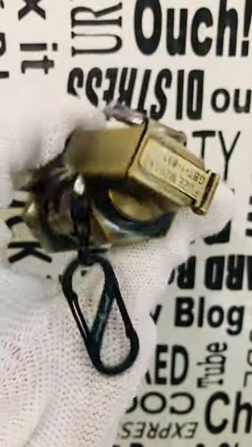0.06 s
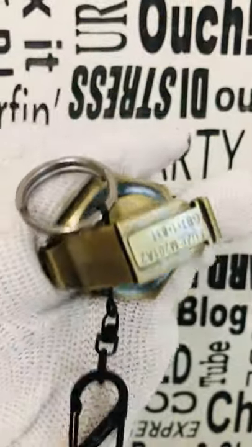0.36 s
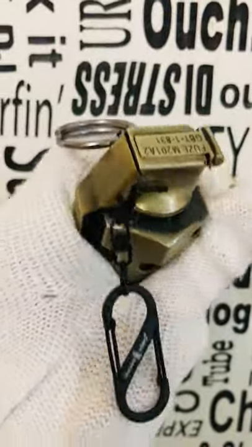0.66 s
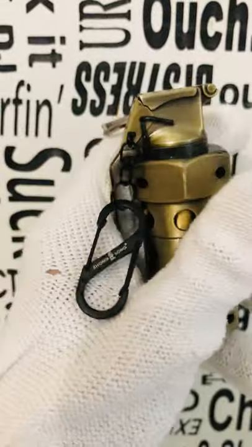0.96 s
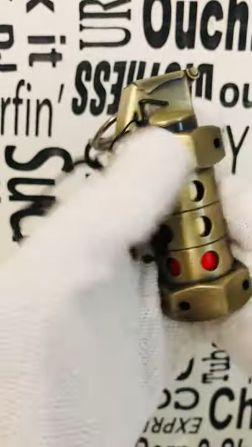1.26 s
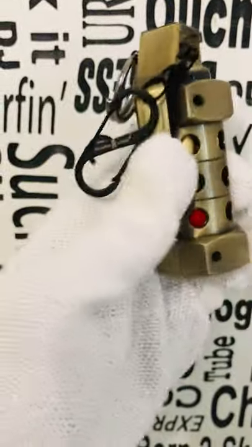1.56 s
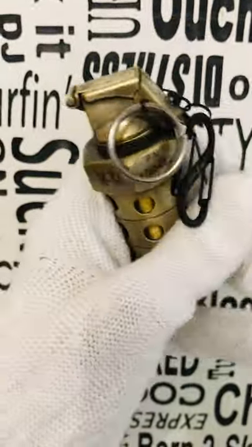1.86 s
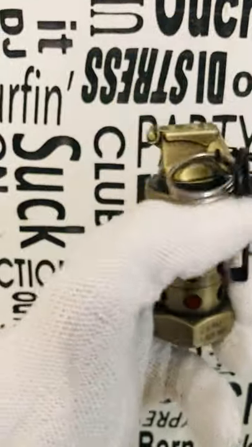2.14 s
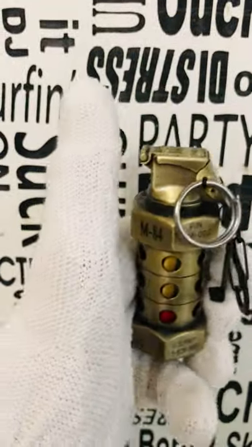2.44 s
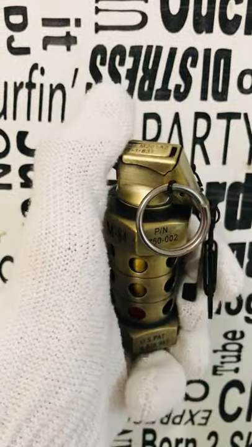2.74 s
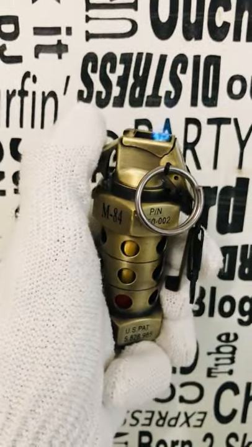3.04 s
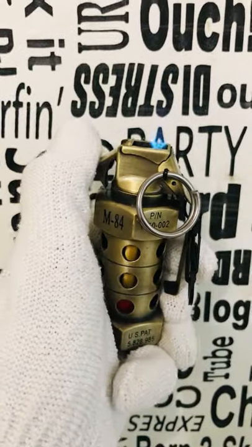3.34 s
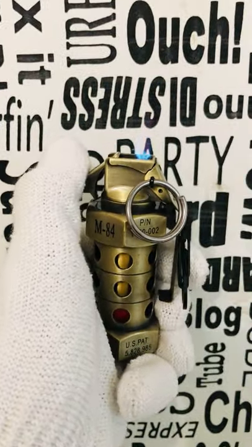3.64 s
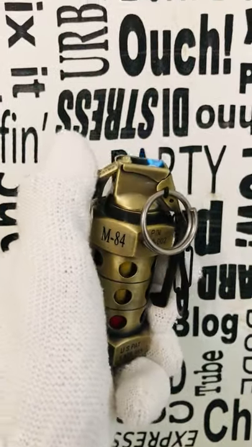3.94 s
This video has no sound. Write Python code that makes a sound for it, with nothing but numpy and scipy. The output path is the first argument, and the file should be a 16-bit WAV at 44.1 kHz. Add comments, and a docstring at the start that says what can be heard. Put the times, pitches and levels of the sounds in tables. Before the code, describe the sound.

A metal jet lighter is turned close by in a small room, its chain and ring clinking. Its lever snaps, gas hisses faintly, then a sharp click lights a steady, hissing flame with a low roar.

```python
"""A gloved hand turns a metal jet lighter close by in a small room. The glove rubs; chain, clip and
pull ring clink, and links rattle over the case. At 2.4 s the lever snaps twice against the case.
At 2.9 s the gas valve opens with a faint hiss. At 3.1 s the piezo igniter cracks and the gas catches
with a small thump that rings a room mode. The jet flame then burns steadily, a low roar under a hiss."""
import sys
import numpy as np
from scipy import signal
from scipy.fft import rfft, irfft, next_fast_len
from scipy.io import wavfile
from scipy.ndimage import uniform_filter1d, map_coordinates

SR = 44100
rng = np.random.default_rng(int(sys.argv[2]) if len(sys.argv) > 2 else 0)


def unload_wav(signal):
    """Save mono or channel-first audio to the path in sys.argv[1] as 16-bit WAV at rate SR, clipped to [-1, 1]."""
    wavfile.write(
        sys.argv[1],
        SR,
        np.round(np.clip(np.atleast_2d(signal).T, -1, 1) * 32767).astype(np.int16),
    )


N = 176400
TOP_HZ, NOISE_TOP_HZ = 16400, 15800


def amp(db):
    """Decibels to gain."""
    return 10 ** (np.asarray(db) / 20)


def unit(x):
    """Scale to rms 1."""
    return x / np.sqrt(np.mean(x ** 2) + 1e-20)


def along(points, hz):
    """Interpolate (Hz, value) points on a log frequency axis."""
    knots_hz, values = np.transpose(points)
    return np.interp(np.log(hz + 1), np.log(knots_hz + 1), values)


def curves(rows):
    """One value per sample for each column after the time."""
    times_s, *columns = np.transpose(rows)
    return [np.interp(np.arange(N) / SR, times_s, column) for column in columns]


def since(start_s):
    """Seconds since start_s, zero before."""
    return np.maximum(np.arange(N) / SR - start_s, 0)


def wobble(rate_hz):
    """A smooth random curve, rate_hz knots a second."""
    knots = rng.standard_normal(int(N * rate_hz / SR) + 4)
    return map_coordinates(knots, [np.arange(N) * rate_hz / SR])


def filtered(x, gain):
    """Apply gain(hz) to the spectrum of x."""
    size = next_fast_len(N + SR // 2)
    return irfft(rfft(x, size) * gain(np.fft.rfftfreq(size, 1 / SR)), size)[:N]


def noise(spectrum):
    """Noise of rms 1, coloured by (Hz, dB) points."""
    white = rng.standard_normal(N)
    return unit(filtered(white, lambda hz: amp(along(spectrum, hz)) * (hz < NOISE_TOP_HZ)))


def add(out, start_s, x):
    """Mix x into out at start_s."""
    part = out[int(start_s * SR):][:len(x)]
    part += x[:len(part)]


def ring(modes, size=8192):
    """Damped sines (Hz, dB, t60 s) of alternating sign."""
    t = np.arange(size) / SR
    return sum((-1) ** k * amp(db - 60 * t / t60_s) * np.sin(2 * np.pi * hz * t)
               for k, (hz, db, t60_s) in enumerate(modes))


def crack(t60_s, body, peaks, tone=((1, 0),), size=8192, smooth_bins=256):
    """Dense metal modes: a noise burst shaped by body, peaks and tone; rms 1 over its first 5 ms."""
    t, hz = np.arange(size) / SR, np.fft.rfftfreq(size, 1 / SR)
    burst = rfft(rng.standard_normal(size) * amp(-60 * t / t60_s))
    burst_power = uniform_filter1d(np.abs(burst) ** 2, size=smooth_bins)
    peak_power = sum(amp(db) ** 2 / (1 + (2 * (hz - centre_hz) / width_hz) ** 2) ** 2
                     for centre_hz, width_hz, db in peaks)
    power = amp(along(body, hz)) ** 2 + peak_power
    gain = np.sqrt(power / burst_power) * amp(along(tone, hz))
    # Minimum phase keeps the attack sharp.
    cepstrum = irfft(np.log(gain))
    cepstrum[1:size // 2] *= 2
    cepstrum[size // 2:] = 0
    hit = irfft(burst * np.exp(rfft(cepstrum)))
    return hit / np.sqrt(np.mean(hit[:SR // 200] ** 2))


# Room rumble. Each row: frequency in Hz, gain in dB.
RUMBLE_SPECTRUM = [(22, -30.5), (45, 1.5), (150, -6.5), (550, -17), (1300, -24.5), (3000, -52.5)]
def background(rumble_db=-69.5, hiss_db=-78.5):
    """The room's quiet rumble and a faint, even hiss."""
    rumble = amp(rumble_db) * noise(RUMBLE_SPECTRUM)
    hiss = amp(hiss_db) * noise([(1000, 5), (3000, 0.5), (15000, -9.5)])
    return rumble + hiss


# Glove on metal. Each row: time in seconds, level in dB.
RUB_LEVELS = [(0, -77.5), (.1, -74), (.165, -60), (.22, -62.5), (.31, -74), (.45, -68.5), (.51, -75),
              (.63, -76), (.67, -71.5), (.94, -70), (1.11, -79), (1.33, -67.5), (1.56, -66.5),
              (1.64, -65.5), (2.03, -72), (2.42, -55.5), (2.68, -78.5)]
# Grip shifts. Each row: centre in seconds, half length in seconds, level in dB.
GRIP_SHIFTS = [(0.797, 0.085, -69), (2.354, 0.055, -63.5)]
# Colours of rub and bump. Each row: frequency in Hz, gain in dB.
RUB_SPECTRUM = [(600, -8), (1100, -4), (3000, -2.5), (4400, -3), (5000, -4.5), (6500, 0), (10400, -4.5),
                (12000, 0), (15500, -2.5)]
BUMP_SPECTRUM = [(30, -14.5), (190, 0), (300, -22), (1000, -36)]
def glove(flutter_db=1.3):
    """Cotton rubs softly over the metal and bumps dully as the grip shifts."""
    t = np.arange(N) / SR
    rub_db, = curves(RUB_LEVELS)
    rub = amp(rub_db + flutter_db * wobble(65)) * noise(RUB_SPECTRUM)
    grip = sum(amp(db) * np.exp(-((t - centre_s) / half_s) ** 2) for centre_s, half_s, db in GRIP_SHIFTS)
    return rub + grip * noise(BUMP_SPECTRUM)


# Chain and ring contacts. Each row: start in seconds, relative level in dB, main resonance in Hz,
# gain at 1.5-3.8 kHz in dB, gain from 11.5 kHz up in dB, t60 in seconds.
CONTACTS = [(0.172, -38.5, 7350.0, -5.5, -1, 0.014), (0.1784, -44.5, 12600, 8.5, 10.5, 0.046),
            (0.2089, -46, 7500, -4, -6, 0.026), (0.2183, -51.5, 3080.0, 13, 9, 0.035),
            (0.2451, -37.5, 5280, -2.5, -3, 0.032), (0.2461, -38, 7440, -9, 3, 0.04),
            (0.257, -40, 12400, -1, 15, 0.016), (0.2972, -42.5, 3100, -2, 0, 0.02),
            (0.377, -54.5, 6700, 1, -3, 0.02), (0.98, -50, 4120.0, 8, -2, 0.04),
            (1.0214, -55.5, 4300, 5, 8, 0.023), (1.0387, -54.5, 2840.0, 4, 2, 0.022),
            (1.3316, -54.5, 4040, 9, 8.5, 0.032), (1.3803, -42.5, 6000, -5, -4, 0.015),
            (1.3873, -49.5, 6010.0, 5, 0, 0.028), (1.409, -27, 12050, -1.5, 3, 0.012),
            (1.4611, -40.5, 9580.0, -2.5, 4, 0.044), (1.5026, -36, 7740.0, -6.5, 0, 0.024),
            (1.5157, -50, 4630, -2, -8, 0.035), (1.5245, -47.5, 4630.0, 0, -5, 0.027),
            (1.5604, -47, 3320.0, -2, 1, 0.017), (1.5703, -41.5, 3260, 6, 3.5, 0.049),
            (1.604, -50, 3250, 12, -8, 0.027), (1.6624, -41, 3210.0, -7, -4.5, 0.043),
            (1.668, -48, 3210.0, 11, -1, 0.037), (1.6997, -46.5, 3180, 15, 10, 0.029),
            (1.7197, -33, 6300, -4, 3, 0.02), (1.7368, -41, 7630, 2, -7, 0.039),
            (1.8266, -39, 12330.0, -3, 0, 0.059), (1.851, -35.5, 3800, -1.5, 0, 0.031),
            (1.879, -48, 2730, 10, 5.5, 0.043), (1.885, -33.5, 12200, -2.5, 4, 0.024),
            (1.893, -41, 7600.0, -1.5, 0, 0.035), (1.901, -43, 5800, -0.5, -2.5, 0.033),
            (1.9243, -47.5, 3770, 2, 1, 0.026), (1.9365, -48.5, 3770, -1, -3.5, 0.049),
            (2.0813, -41, 1600, -1, -5.5, 0.042), (2.0884, -39, 2650, -2, 5.5, 0.053),
            (2.106, -41.5, 2580, 7, 5, 0.035), (2.1111, -35.5, 10200, -4.5, -0.5, 0.035),
            (2.12, -41, 6580.0, -1, -3, 0.09), (2.1468, -39, 12000, 2, 3, 0.039),
            (2.1608, -46, 8270.0, -2, -1.5, 0.035), (2.166, -42, 3920.0, 0.5, 0.5, 0.022),
            (2.1802, -42.5, 8700, -2.5, -0.5, 0.026), (2.1847, -47.5, 8550.0, 1, -8.5, 0.061),
            (2.263, -37, 7000, 1, 2.5, 0.045), (2.2808, -35, 12670.0, 0.5, 5, 0.019),
            (2.2953, -33, 12900, -4, -1, 0.013), (2.3501, -42, 2730, 6, 6.5, 0.12),
            (2.4062, -32, 7670.0, -3, 5.5, 0.022), (2.4556, -35, 12780.0, 4.5, 5, 0.015),
            (2.4637, -37.5, 5640, 2.5, -2.5, 0.079), (2.7529, -63.5, 10980, 7, 10, 0.021),
            (2.8076, -63.5, 5470.0, -3.5, -7.5, 0.015)]
# Broad colour of a clink. Each row: frequency in Hz, gain in dB.
CLINK_SPECTRUM = [(100, -33.5), (850, -21), (1250, -12.5), (1600, -4), (4500, -1.5), (5000, -6),
                  (6200, 2.5), (10400, -0.5), (15600, -1.5), (17000, -34.5)]
# Clip and ring resonances. Each row: centre in Hz, width in Hz, gain in dB.
HARDWARE_PEAKS = [(1740, 400, 0.5), (2680, 150, 2), (3120, 180, 1), (4360, 930, -0.5), (7440, 510, 2.5),
                  (12230, 1700, 2.5)]
PEAK_WIDTH_HZ, STRUCK_PEAK_DB, LINK_LOW_HZ = 305, 11, 2600
def chain_clinks(link_peak_db=7, link_top_hz=15800):
    """Each contact rings the struck part and three nearby links."""
    out = np.zeros(N)
    for start_s, db, struck_hz, low_db, high_db, t60_s in CONTACTS:
        tone = [(800, 0), (1500, low_db), (3800, low_db), (5500, 0), (9000, 0), (11500, high_db)]
        links = [(hz, PEAK_WIDTH_HZ, link_peak_db) for hz in rng.uniform(LINK_LOW_HZ, link_top_hz, 3)]
        peaks = HARDWARE_PEAKS + links + [(struck_hz, PEAK_WIDTH_HZ, STRUCK_PEAK_DB)]
        add(out, start_s, amp(db - 1) * crack(t60_s, CLINK_SPECTRUM, peaks, tone))
    return out


# Room decay. Each row: frequency in Hz, t60 in seconds.
ROOM_DECAY = [(200, 0.88), (3000, 0.53), (8000, 0.38), (15000, 0.09)]
def room(x):
    """The walls return a diffuse tail after 5 ms, shorter in the treble."""
    hz, t, spectra = signal.stft(rng.standard_normal(SR // 2), SR, nperseg=256)
    decay = amp(-60 * t / along(ROOM_DECAY, hz)[:, None])
    _, tail = signal.istft(spectra * decay, SR, nperseg=256)
    response = np.pad(tail, (SR // 200, 0)) / np.linalg.norm(tail)
    return signal.fftconvolve(x, response)[:N]


# Taps on clip or case. Each row: start in seconds, frequency in Hz, level in dB, t60 in seconds.
TAPS = [(0.557, 3240, -56, 0.012), (0.907, 2950, -53, 0.02), (1.4086, 4750, -34.5, 0.022),
        (1.887, 1170, -51.5, .046), (2.089, 2697, -47, .13), (2.155, 11100, -47, 0.061),
        (2.364, 12980, -25, .03)]
def taps():
    out = np.zeros(N)
    for start_s, hz, db, t60_s in TAPS:
        add(out, start_s, ring([(hz, db, t60_s)]))
    return out


# Pull ring modes. Each row: frequency in Hz, gain in dB, t60 in seconds.
PULL_RING_MODES = [(4720, -14, .07), (7550, -16, .07), (9035, 0, .095), (11700, -17, .06)]
# Strikes on the ring. Each row: start in seconds, level in dB.
PULL_RING_STRIKES = [(1.0387, -59), (1.4082, -37.5), (1.4613, -55), (2.262, -49), (2.363, -42)]
def pull_ring():
    """The steel ring sings in the same modes at every strike."""
    out = np.zeros(N)
    for start_s, db in PULL_RING_STRIKES:
        add(out, start_s, amp(db) * ring(PULL_RING_MODES))
    return out


# Chain slides. Each row: start in seconds, end in seconds, top tick level in dB.
SLIDES = [(1.458, 1.629, -50.5), (1.663, 1.751, -51.5), (1.832, 1.911, -49), (2.087, 2.183, -44),
          (2.399, 2.485, -49.5)]
def chain_rattle(ticks_per_s=100, spread_db=12.5, link_top_hz=9050, t60_s=0.02):
    """Links slide over the case, each ticking at its own pitch."""
    out = np.zeros(N)
    for start_s, end_s, db in SLIDES:
        count = int((end_s - start_s) * ticks_per_s)
        for k, (lag, weakness, pitch) in enumerate(rng.random((count, 3))):
            link_hz = LINK_LOW_HZ * (link_top_hz / LINK_LOW_HZ) ** pitch
            peaks = HARDWARE_PEAKS + [(link_hz, PEAK_WIDTH_HZ, STRUCK_PEAK_DB)]
            tick = crack(t60_s, CLINK_SPECTRUM, peaks, size=2048, smooth_bins=64)
            add(out, start_s + (k + lag) / ticks_per_s, amp(db - spread_db * weakness) * tick)
    return out


# Lever snaps. Each row: start in seconds, relative level in dB, rebound trim in dB, t60 in seconds.
LEVER_SNAPS = [(2.363, -23.5, -4.5, 0.011), (2.3919, -22.5, 4.5, 0.0072)]
# Broad colour of the case. Each row: frequency in Hz, gain in dB.
CASE_SPECTRUM = [(100, -30.5), (900, -25), (1700, -6.5), (4000, -10.5), (7000, -1.5), (13000, 1),
                 (17000, -8.5)]
# Case resonances. Each row: centre in Hz, width in Hz, gain in dB.
CASE_PEAKS = [(2570, 300, 2), (3150, 250, -4), (4780, 220, 1.5), (6540, 250, 2), (7475, 300, 7.5),
              (11440, 350, 8), (12240, 300, 2), (12980, 350, 6)]
def lever(rebound_s=0.001):
    """The lever strikes the case and rebounds at once."""
    out = np.zeros(N)
    for start_s, db, trim_db, t60_s in LEVER_SNAPS:
        for delay_s, hit_db in [(0, db - 3.5), (rebound_s, db + trim_db - 2.5)]:
            hit = crack(t60_s, CASE_SPECTRUM, CASE_PEAKS, smooth_bins=128)
            add(out, start_s + delay_s, amp(hit_db) * hit)
    return out


SPARK_S, CATCH_S = 3.1117, 3.1152
# Hiss of unlit gas. Each row: frequency in Hz, gain in dB.
GAS_SPECTRUM = [(590, -46.5), (1000, -17), (1280, -23), (1790, -6.5), (2410, -19), (2850, -3.5),
                (3800, -14.5), (4570, -19), (5440, -7), (7700, -8.5), (9170, 1), (12800, -10.5),
                (15100, -5.5)]
def gas(open_s=2.902, rise_s=0.069, fade_s=0.17, level_db=-53):
    """Unlit gas swells as the valve opens and gives way to the flame."""
    swell = 1 - np.exp(-since(open_s) / rise_s)
    fade = np.exp(-since(SPARK_S) / fade_s)
    return amp(level_db) * swell * fade * noise(GAS_SPECTRUM)


# Igniter resonances. Each row: centre in Hz, width in Hz, gain in dB.
IGNITER_PEAKS = [(2570, 190, 12), (2920, 470, 12), (3470, 180, 11.5), (4200, 1100, 9), (6250, 440, 9.5),
                 (6930, 220, 10.5), (13400, 740, 6), (14500, 600, 8)]
# Colours of the crack and of its wash off the walls. Each row: frequency in Hz, gain in dB.
IGNITER_SPECTRUM = [(40, -28), (750, -1.5), (1200, -14), (1700, 0.5), (5300, -5), (6600, 3), (7300, -9),
                    (7900, 4.5), (9900, 5), (11700, -3.5), (12200, 4), (15600, 5), (17000, -6)]
WASH_SPECTRUM = [(200, 2.5), (800, -3.5), (1200, -11.5), (2200, -3), (2900, 1.5), (4300, 1), (5200, -7),
                 (6300, -3), (7600, -9), (9200, 2), (11000, -7), (15000, -2), (16500, -25)]
def igniter(level_db=-15, t60_s=0.017, wet_db=-11.5):
    """The piezo hammer gives one solid crack; the walls return it as a smooth wash."""
    direct, pulse = np.zeros((2, N))
    add(direct, SPARK_S, amp(level_db) * crack(t60_s, IGNITER_SPECTRUM, IGNITER_PEAKS, smooth_bins=64))
    add(pulse, SPARK_S, np.ones(1))
    wash = filtered(room(pulse), lambda hz: amp(along(WASH_SPECTRUM, hz)))
    wash *= np.linalg.norm(direct) / np.linalg.norm(wash)
    return direct + amp(wet_db) * wash


def gas_catch(thump_hz=195, room_mode_hz=193.8, low_cut_hz=67):
    """The gas catches with a thump that wakes a room mode."""
    out = np.zeros(N)
    add(out, CATCH_S, -ring([(thump_hz, -17, 0.02)]))
    add(out, CATCH_S, ring([(room_mode_hz, -38, 0.86)], size=32768))
    return signal.sosfilt(signal.butter(2, low_cut_hz, "high", fs=SR, output="sos"), out)


# Flame strength. Each row: time in seconds, roar level in dB, hiss level in dB.
FLAME_LEVELS = [(3.25, -49, -53), (3.358, -45.5, -50.5), (4.0, -48.5, -53)]
# Colours of roar and nozzle hiss. Each row: frequency in Hz, gain in dB.
ROAR_SPECTRUM = [(25, -38), (50, -13), (100, -17), (135, -3.5), (184, 0), (194, 9.5), (205, -3), (250, 1.5),
                 (335, -5.5), (380, -4), (880, -5), (1100, -10.5), (1250, -29), (2000, -63)]
NOZZLE_SPECTRUM = [(710, -23), (1200, -8), (1370, 3), (1590, -1), (1770, -8.5), (1980, -1), (2300, -6),
                   (2510, 0.5), (2680, 2), (3220, -2), (3700, -3), (4410, -9), (5020, -16), (5410, -15),
                   (5970, -3), (6230, 0), (7410, -9.5), (8080, -17.5), (9510, -9), (10600, -13.5),
                   (14000, -3.5), (15200, -7), (16000, -16)]
def flame(rise_s=0.043, roar_flutter_db=1.43, hiss_flutter_db=0.66):
    """The jet burns with a fluttering low roar under the hiss of the nozzle."""
    roar_db, hiss_db = curves(FLAME_LEVELS)
    roar = amp(roar_db + roar_flutter_db * wobble(35)) * noise(ROAR_SPECTRUM)
    hiss = amp(hiss_db + hiss_flutter_db * wobble(25.37)) * noise(NOZZLE_SPECTRUM)
    swell = 1 - np.exp(-since(CATCH_S) / rise_s)
    return swell * (roar + hiss)


def scene(metal_wet_db=-17.5):
    """The lighter close by, the room and its quiet floor, in mono."""
    floor = background()
    burner = gas() + igniter() + gas_catch() + flame()
    hand = glove()
    metal = lever() + chain_clinks() + taps() + pull_ring() + chain_rattle()
    return (floor + hand + metal + amp(metal_wet_db) * room(metal) + burner)[None]


def record(dry):
    """A steep low-pass at TOP_HZ."""
    return filtered(dry[0], lambda hz: 1 / (1 + (hz / TOP_HZ) ** 120))[None]


dry = scene()
out = record(dry)
unload_wav(out)
```